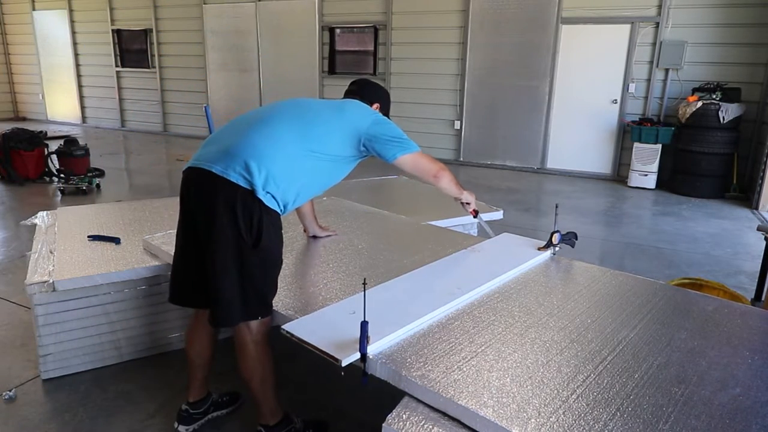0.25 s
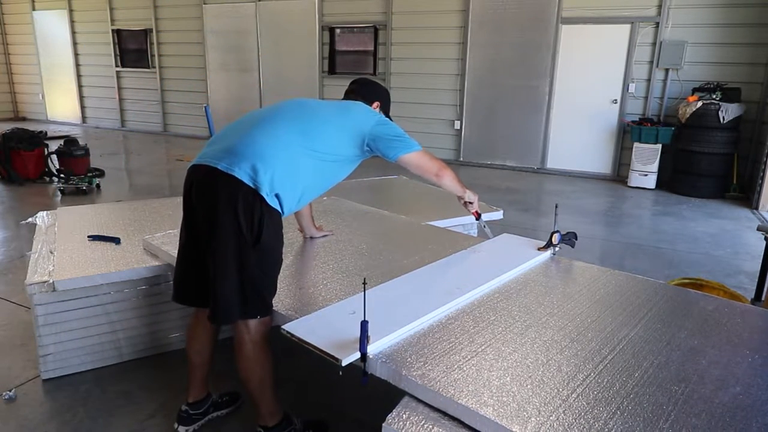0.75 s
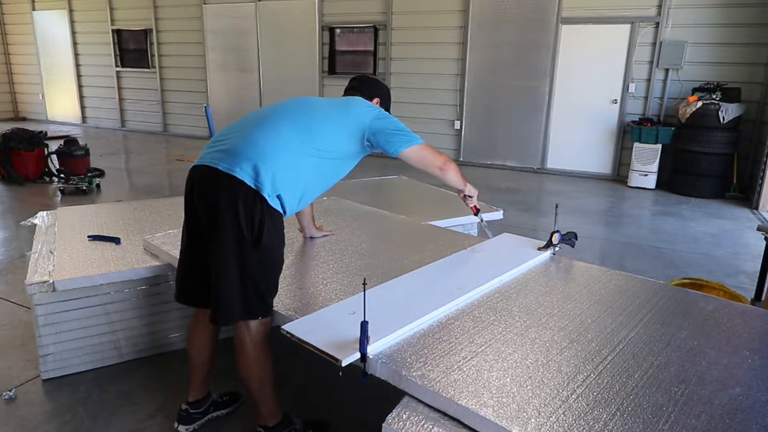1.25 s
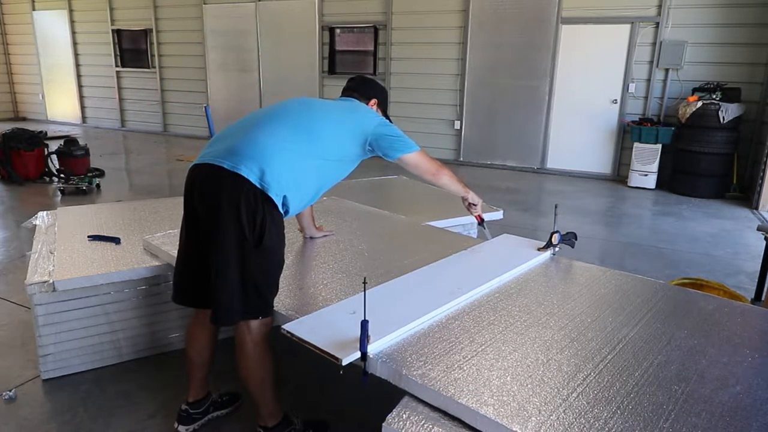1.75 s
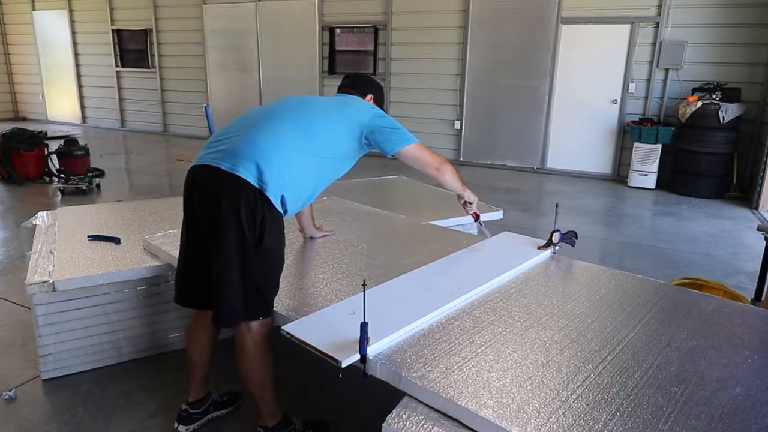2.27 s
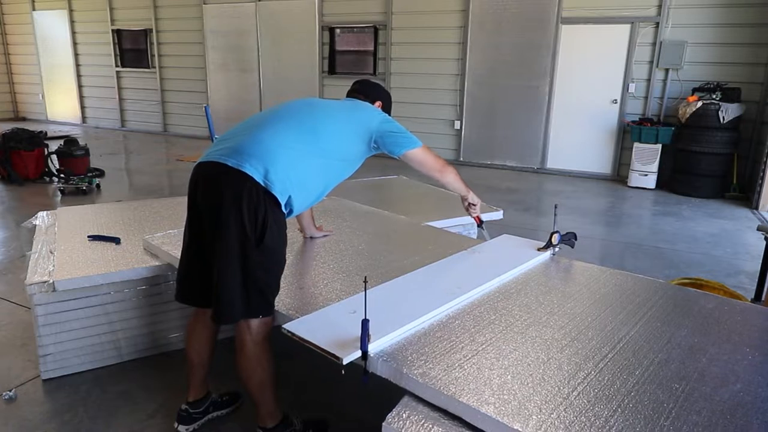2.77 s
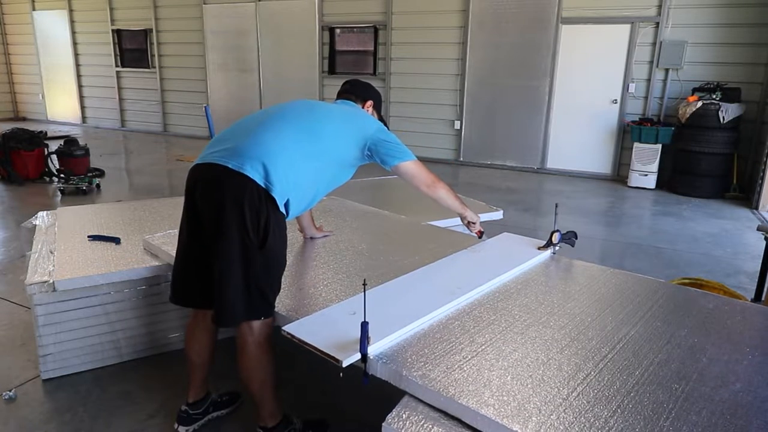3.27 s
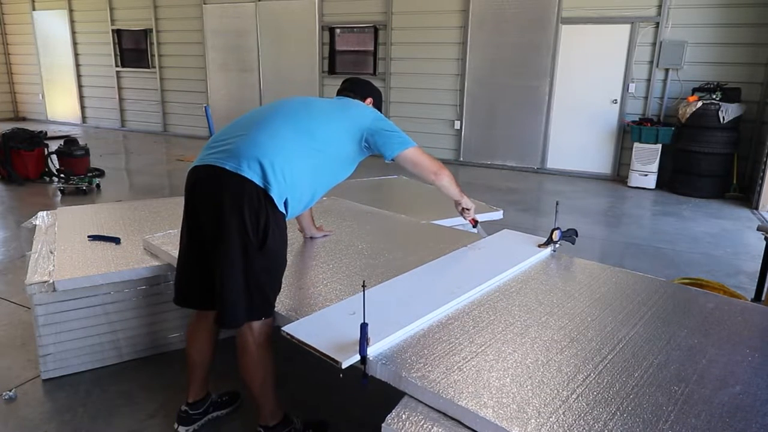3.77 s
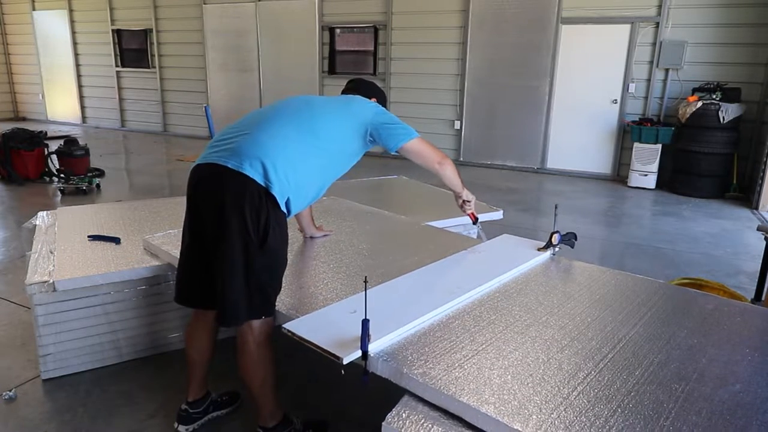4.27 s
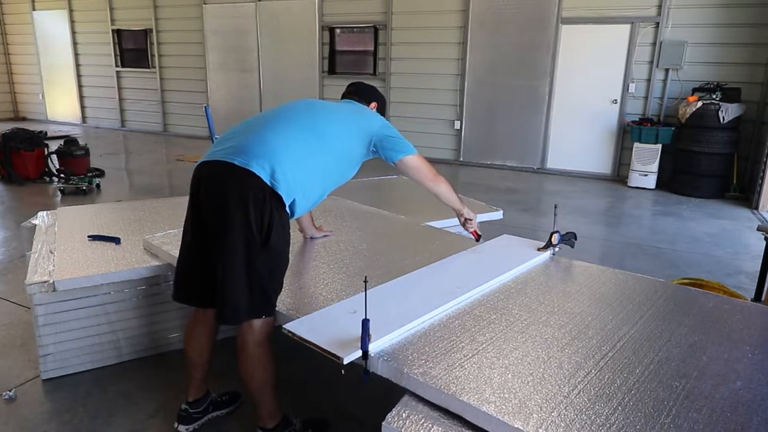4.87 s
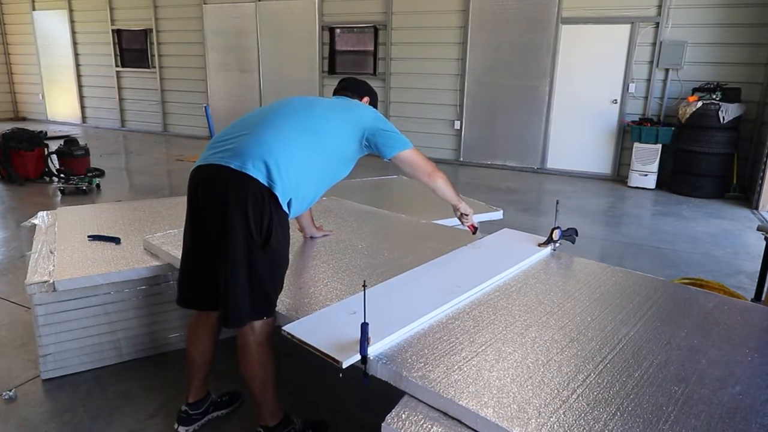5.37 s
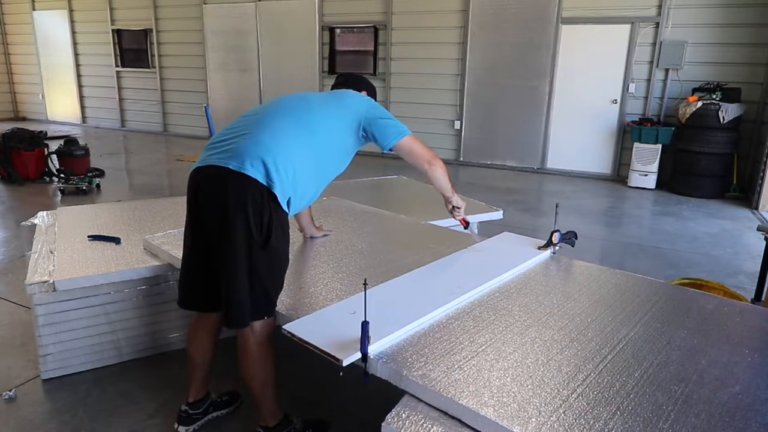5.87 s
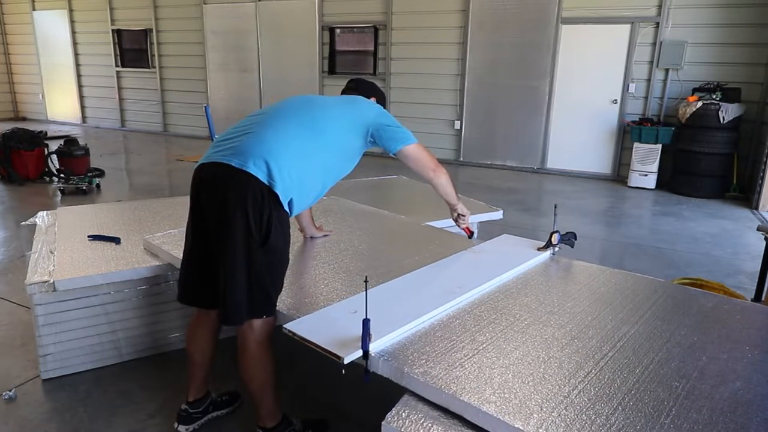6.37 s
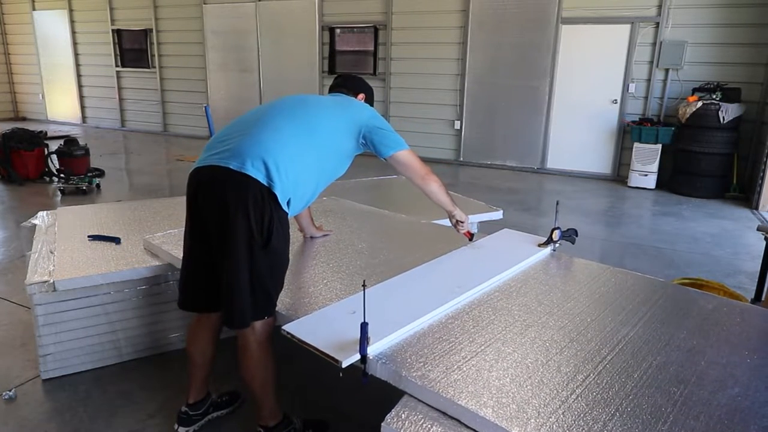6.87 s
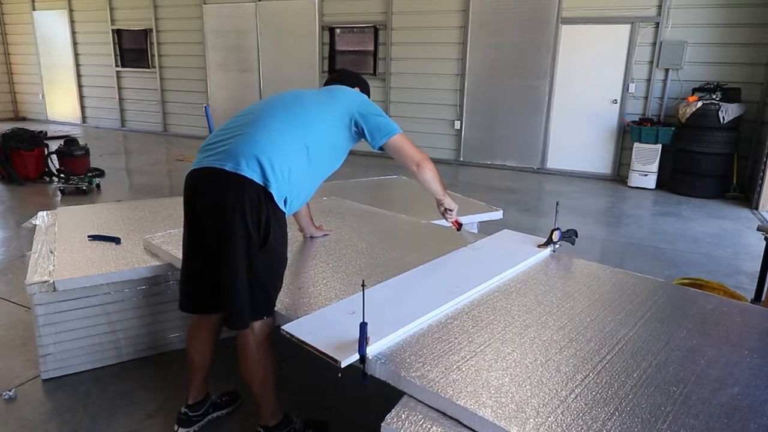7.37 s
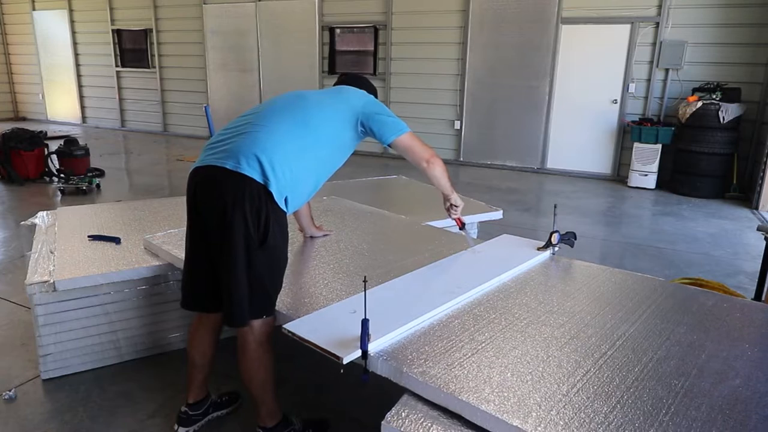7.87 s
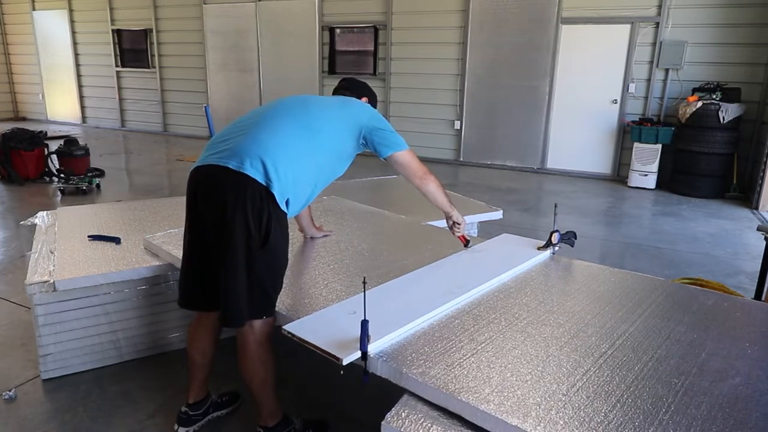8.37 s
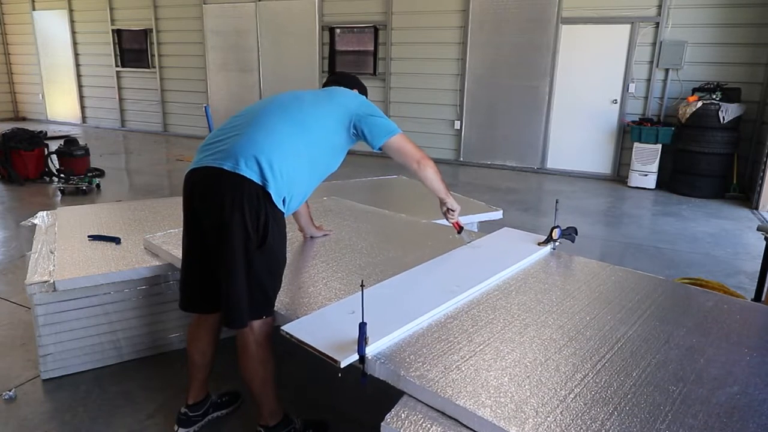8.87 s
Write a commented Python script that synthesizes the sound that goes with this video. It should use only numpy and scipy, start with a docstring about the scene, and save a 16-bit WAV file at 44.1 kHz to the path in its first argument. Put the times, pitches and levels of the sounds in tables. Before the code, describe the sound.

Hand sawing of stiff foam, irregular and squeaky, heard from moderate distance inside a reverberant hall. Early on there are soft dry scrapes, a few short whistling shrieks and small knocks. The middle is sparse, mostly faint rasping. Later, long strokes screech upward, hiss at full speed and groan as the blade binds, while the panel thuds and drones. Hard snaps and piercing squeaks continue to the end.

```python
"""A knock and a hollow bump, then light scrapes and hard strokes: a serrated knife saws a rigid foam board.
Foam sticks and slips on the blade: a squeal whose pitch follows the blade's speed, a groan as it stops,
a hiss at full speed. Teeth crush foam cells, giving fizz, rasp and blade ring; the panel drones, thuds
and heaves. A large, echoing workshop rings on."""
import sys
import numpy as np
from scipy import signal
from scipy.fft import rfft, irfft, next_fast_len
from scipy.io import wavfile
from scipy.ndimage import uniform_filter1d, minimum_filter1d

SR = 44100
rng = np.random.default_rng(int(sys.argv[2]) if len(sys.argv) > 2 else 0)


def transcribe(u):
    """Save the signal u as a 16-bit wav file named by the first command-line argument.

    u: samples, shape (n,) or (channels, n), limited to [-1, 1]; the rate is SR.
    q: integer samples, one column per channel.
    """
    v = np.clip(np.atleast_2d(u).T, -1, 1)
    q = np.round(v * 32767).astype(np.int16)
    wavfile.write(sys.argv[1], SR, q)


N = 402633  # samples

# Table levels are relative: each layer has its own gain.
# Hard cutting strokes: start_s, length_s, speed_up_s, slow_down_s, entry_slip_hz, full_slip_hz,
# roughness [0-1], squeal_db, fizz_db, rasp_db, pressure_rise_db [over the stroke]
STROKES = [(1.207, 0.14, .02, 0.042, 13600, 14170, 0.2, -23.5, -23.5, -30.5, 8.5),
           (1.847, .11, .01, 0.09, 15000, 15000, .04, -19, -41, -45, 6),
           (2.189, .257, 0.021, 0.065, 14700, 13840, 0.19, -26, -35.5, -41.5, -5),
           (4.008, 0.12, 0.0097, 0.076, 14300, 14690, 0.2, -16, -28, -36, 3),
           (4.726, 0.22, .2, .01, 13600, 12350, .12, -19, -28.5, -36, 0),
           (4.951, .125, .02, 0.081, 12850, 12050, 0.2, -19.5, -23, -35, -5),
           (5.297, .622, 0.16, 0.12, 6430, 13190, .13, -20, -25, -38, 6),
           (6.211, .51, .13, .2, 7490, 13080, .1, -19, -24, -38, 2.5),
           (6.984, 0.6, .36, .06, 1400, 12580, 0.2, -23, -21.5, -35.5, -8),
           (7.934, 0.43, 0.096, .08, 10400, 13600, 0.28, -30, -23.5, -30.5, -14),
           (8.703, 0.31, 0.077, 0.089, 8110, 13850, 0.04, -25.5, -30.5, -48, 20.5)]
# Light scrapes along the cut: start_s, length_s, drone_db, rasp_db, fizz_db, pressure_rise_db
SCRAPES = [(.22, 0.3, -49.5, -48.5, -53, 13), (0.594, .43, -42.5, -40.5, -50.5, -1),
           (1.015, 0.31, -49, -46, -54, 5), (1.313, 0.37, -47.5, -38.5, -45, 9),
           (1.619, 0.37, -41.5, -42, -44.5, -0.5), (1.97, 0.42, -55, -46, -51, 16),
           (2.504, 0.35, -46, -42, -43, 0), (2.763, 0.21, -34.5, -36, -44, -8),
           (2.902, 0.54, -43.5, -42.5, -42.5, -2), (3.452, 0.78, -45.5, -43.5, -45.5, 6),
           (4.072, 0.25, -46, -46, -56, 6), (4.317, 0.31, -56, -50, -46, 12),
           (4.504, 0.7, -37.5, -40, -43, -2), (5.037, 0.47, -54.5, -52, -52, -1),
           (5.484, 0.4, -39, -33.5, -46, 2), (5.85, 0.29, -43.5, -31.5, -38, -2),
           (6.126, 0.25, -44.5, -37, -34, 14), (6.312, 0.34, -41, -34, -53, 4),
           (6.685, 0.33, -44, -31, -41.5, -11), (7.39, 0.45, -42, -27.5, -39, 4),
           (7.794, .17, -37, -35, -42, 7), (8.02, 0.46, -46.5, -27, -27, 1),
           (8.329, 0.35, -36.5, -32.5, -41, -1), (8.662, 0.55, -43.5, -35, -31, -0.5)]
# Blade stirring in the cut between scrapes: drone_db, rasp_db, fizz_db
RESTING_DB = (-52.5, -56.5, -64.5)
# Foam gripping the blade: start_s, length_s, first_hz, middle_hz, last_hz, level_db, roughness [0-1]
SQUEAKS = [(1.295, .056, 4090, 3910, 3030, -21, 0.24), (1.418, 0.044, 1404, 2820, 5000, -32, 0.1),
           (1.467, 0.083, 11200, 10400, 13100, -26.5, .045), (1.512, 0.12, 11800, 13360, 13700, -27, 0.21),
           (2.228, 0.068, 15000, 14100, 13100, -20.5, 0.14), (2.412, 0.04, 6220, 4990, 3450, -30, 0.16),
           (2.546, 0.069, 3410, 4870, 6750, -35.5, 0.18), (2.6, 0.17, 9400, 12300, 15000, -37, 0.22),
           (3.004, 0.088, 13840, 9550, 9140, -26, 0), (3.046, 0.19, 10570, 11020, 10350, -31, 0.15),
           (3.83, 0.16, 15400, 14300, 13200, -37.5, 0.12), (4.268, 0.17, 4780, 5800, 8860, -50, 0.22),
           (4.45, 0.053, 7200, 10500, 15600, -39.5, 0.1), (4.569, .07, 14000, 14500, 14000, -34.5, 0.07),
           (5.004, 0.07, 4680, 4034, 3605, -24.5, .15), (5.24, 0.16, 5020, 4700, 4500, -36.5, 0.1),
           (5.38, .07, 4900, 4850, 4700, -31, 0.17), (5.336, 0.062, 4690, 4315, 4950, -12.5, 0.04),
           (5.849, 0.055, 5600, 4195, 2800, -21.5, 0.19), (6.156, 0.1, 6260, 8100, 8300, -34, 0.2),
           (6.158, 0.068, 4600, 4430, 3940, -33.5, 0.12), (6.214, 0.098, 3400, 4075, 5350, -24, 0.16),
           (6.265, 0.082, 8860, 9960, 10650, -20.5, .09), (6.567, 0.13, 4310, 3620, 3206, -22, .15),
           (6.655, .055, 3390, 3540, 3460, -19, .035), (6.999, 0.08, 1093, 1416, 2150, -28.5, 0.38),
           (7.029, .085, 1898, 2464, 4870, -18.5, 0.03), (7.08, 0.086, 4480, 4700, 4920, -17, 0.04),
           (7.144, 0.13, 8360, 8220, 8100, -19.5, 0), (7.237, 0.098, 10040, 10700, 12100, -21, 0.05),
           (7.515, .06, 4934, 3620, 1290, -20.5, 0.3), (7.574, 0.28, 1310, 1284, 1293, -41, 0.08),
           (7.961, 0.073, 1893, 3010, 4640, -22.5, 0.44), (8.037, 0.092, 14500, 13800, 14300, -20, 0.1),
           (8.318, 0.051, 12900, 9260, 7460, -27.5, 0.04), (8.721, 0.058, 8550, 10600, 14100, -26.5, 0.14),
           (8.786, .155, 14800, 13550, 14600, -21.5, 0), (8.798, 0.025, 5110, 4790, 4470, -24.5, 0.02),
           (8.947, 0.084, 7400, 9800, 13750, -20, 0.1), (8.935, 0.17, 4700, 4600, 4920, -23.5, 0.07),
           (9.029, 0.0385, 4580, 5000, 5070, -13.5, 0.04), (9.034, 0.097, 1290, 1336, 1760, -32, .11),
           (9.074, .065, 4980, 5090, 4950, -18.5, 0.06)]
# Blade snags and knocks: start_s, level_db, thud_db, treble_db
KNOCKS = [(0.079, -27.5, -24, -11), (1.746, -27, -12, -18), (2.790, -5, -26.5, -11), (2.937, -18, -27, -13),
          (3.119, -25, -13.5, -25), (3.211, -22, -18, -10), (3.743, -32, -33, -8), (3.88, -24, -48, -10),
          (4.248, -30, -14, -27), (5.586, -14.5, -45, -16), (6.273, -24, -38, 7), (6.381, -25, -8.5, -17),
          (7.962, -11, -19.5, -1), (8.345, -11, -19, -3)]
# Board bumping on its support: start_s, level_db
BUMPS = [(0.1054, -26), (2.825, -47), (2.88, -35), (4.599, -35), (4.684, -35), (4.695, -37), (4.724, -42),
         (6.385, -33), (6.429, -35.5)]
# Slow heaves of the big panel: crest_s, half_width_s [to 1/e], level_db
HEAVES = [(1.72, 0.099, -43), (2.42, 0.21, -41), (2.54, 0.027, -28), (3.05, 0.4, -52), (4.42, 0.14, -42.5),
          (4.72, 0.043, -38), (5.0, 0.072, -36), (6.15, 0.058, -46), (6.42, .1, -41.5), (7.73, 0.034, -44),
          (8.6, 0.1, -58)]

# Blade resonances in the cut: centre_hz, width_hz, level_db
BLADE_MODES = [(1950, 86, -10), (2630, 110, -3), (3143, 52, 4.5), (3410, 126, 2), (3710, 93, -2),
               (4200, 150, -1), (4840, 72, 9.5), (4870, 220, 0.5), (5940, 270, -13.5), (6190, 99, -15.5)]
# Board modes: pitch_hz, level_db, t60_s
BOARD_MODES = [(111, -12.5, 0.3), (170.4, -5, 0.15), (240, -7, 0.13), (342, -5.5, 0.19), (395, -6, 0.068),
               (708, -5, 0.18), (919, 0, 0.027), (1012, -1.5, 0.091), (1523, 8, 0.043), (2076, 6, 0.047),
               (2496, 17, 0.017), (2910, 5.5, 0.043), (4700, 8, 0.046)]
# Radiation of the squeal by blade and board: freq_hz, gain_db
RADIATION = [(800, -15), (2000, 1), (3400, -4.5), (4700, 1.5), (6000, -4), (7500, -3), (9000, -2.5),
             (10500, -0.5), (13000, -0.5), (15500, 1)]
# Hall decay: freq_hz, t60_s
HALL_DECAY = [(100, 0.93), (500, 1.32), (2000, 0.45), (3600, 0.67), (7000, 0.61), (11000, 0.43),
              (16000, 0.2)]

# Spectra of panel drone, blade rasp, crushed cells, thud, crack, snap, panel sway, still air:
# freq_hz, density_db [per Hz]
DRONE_SPECTRUM = [(40, -5), (95, 2.5), (130, -2), (185, 2.5), (310, 0), (440, 1.5), (650, 1.5), (820, -1.5),
                  (1280, 4.5), (1700, -2.5), (2300, -4.5), (4000, -17.5)]
RASP_SPECTRUM = [(500, -41), (1500, -4), (2400, -6.5), (3300, 1.5), (5000, 1), (6300, -4), (9000, -10.5),
                 (16000, -45)]
FIZZ_SPECTRUM = [(2500, -48), (5500, 1.5), (7200, -1.5), (8300, 2), (10300, 4.5), (13500, 2), (16000, 2)]
THUD_SPECTRUM = [(40, -17), (110, -21), (175, 7.5), (340, 6), (700, 4), (1000, 1), (1600, -4), (3000, -58)]
CRACK_SPECTRUM = [(150, -63), (700, -13.5), (1400, 1), (2600, -2), (4400, 2.5), (6000, -6), (12000, -27)]
SNAP_SPECTRUM = [(1500, -13), (3800, -2), (5000, 11), (6500, -13), (10000, -4.5), (16000, -6)]
SWAY_SPECTRUM = [(10, -4.5), (27, 1), (45, 3.5), (90, -13.5), (200, -29), (600, -39)]
AIR_SPECTRUM = [(20, -6), (80, 0), (300, -5.5), (1000, -1.5), (3500, -8.5), (8000, -51), (16000, -53)]

STALL_HZ, BRAKING_POWER = 1218, 1.5  # slip rate as the blade stops; power law of slowing
STROKE_ATTACK_S, STROKE_RELEASE_S = 0.053, 0.014
BIND_ROUGH, BIND_RASP_DB, BIND_FIZZ_DB = 0.12, 12, -17  # what a slow, binding blade adds
HAND_DB, HAND_RATE_HZ = -0.53, 21.8  # unsteadiness of the hand; its changes a second
SCRAPE_ATTACK, SCRAPE_RELEASE = 0.19, 0.38  # shares of length
SQUEAK_ATTACK, SQUEAK_RELEASE = 0.25, 0.26  # shares of length
BLADE_SHIFT = 0.043  # share by which resonances move with the blade's free length
TOP_HZ, CEILING = 15830, 0.87  # band limit; full-scale amplitude that peaks round off towards


def cutting(squeal_db=-4.5, drone_db=-1.5, rasp_db=-5, ring_db=-4, fizz_db=-2, grit_db=-14, chirp_db=-7):
    """Teeth tear cells: foam squeals and fizzes, blade rasps and rings, panel drones."""
    squeal, hard_rasp, hard_fizz = strokes()
    drone, light_rasp, light_fizz = scrapes()
    rasp = np.hypot(hard_rasp, light_rasp)
    fizz = np.hypot(hard_fizz, light_fizz)

    cells = coloured(bite() * crackle(rate_hz=10000, scatter_db=1.0), FIZZ_SPECTRUM)
    grit = coloured(crackle(rate_hz=130, scatter_db=-6.5), SNAP_SPECTRUM)  # whole beads tearing out
    teeth = coloured(bite() * crackle(rate_hz=4000, scatter_db=3.0), RASP_SPECTRUM)
    ring = ringing(bite() * crackle(rate_hz=1200, scatter_db=0))
    panel = coloured(bite() * crackle(rate_hz=1500, scatter_db=1.5), DRONE_SPECTRUM)

    foam = amp(fizz_db) * cells + amp(grit_db) * grit + amp(chirp_db) * chirps()
    steel = amp(rasp_db) * teeth + amp(ring_db) * ring
    return amp(squeal_db) * squeal + fizz * foam + rasp * steel + drone * amp(drone_db) * panel


def strokes():
    """Squeal, rasp strength and fizz strength; slip rate follows blade speed through each stroke."""
    squeal, rasp, fizz = np.zeros((3, N))
    for (start_s, length_s, speed_up_s, slow_down_s, entry_hz, full_hz,
         rough, squeal_db, fizz_db, rasp_db, lean_db) in STROKES:
        t, force = gesture(length_s, STROKE_ATTACK_S, STROKE_RELEASE_S)
        hand_db = HAND_DB * wobble(HAND_RATE_HZ, size=len(t))
        force = force * amp(lean_db * (t / length_s - 0.5) + hand_db)

        running_hz = entry_hz + (full_hz - entry_hz) * ramp(t / speed_up_s)
        braked = np.clip(1 - (length_s - t) / slow_down_s, 0, 1) ** BRAKING_POWER
        pitch_hz = running_hz + (STALL_HZ - running_hz) * braked
        bind = np.clip(1 - pitch_hz / full_hz, 0, 1)

        voice = stick_slip(pitch_hz, rough + BIND_ROUGH * bind, catch_db=2.5, wander=0.25,
                           twin_db=-13.5, twin_apart=0.3, second_db=-5, third_db=-14)
        add(squeal, start_s, amp(squeal_db) * force * voice)
        add(rasp, start_s, amp(rasp_db + BIND_RASP_DB * bind) * force)
        add(fizz, start_s, amp(fizz_db + BIND_FIZZ_DB * bind) * force)
    radiated = filtered(squeal, lambda hz: amp(along(RADIATION, hz)))
    return radiated, rasp, fizz


def stick_slip(pitch_hz, rough, catch_db, wander, twin_db, twin_apart, second_db, third_db,
               cycles_per_slip=2.2):
    """Foam grips and releases each blade flank; uneven slips smear the whistle into a screech."""
    def chance(rate_hz):
        return wobble(rate_hz, size=len(pitch_hz))

    def flank(detune):
        jitter = 0.82 * chance(pitch_hz / cycles_per_slip) + wander * chance(130)
        slip_hz = pitch_hz * np.exp(detune + rough * jitter)
        phase = 2 * np.pi * np.cumsum(slip_hz) / SR
        # overtones stop at the Nyquist limit
        second = amp(second_db) * np.sin(2 * phase) * (2 * slip_hz < SR / 2)
        third = amp(third_db) * np.sin(3 * phase) * (slip_hz < SR / 6)
        grip = amp(catch_db * chance(450))  # each tooth catches with its own force
        return unit(grip * (np.sin(phase) + second + third))

    # the other flank slips at a wandering, on average faster, rate
    twin = flank(twin_apart * np.sqrt(np.abs(rough)) * (1 + chance(30)))
    return unit(flank(0) + amp(twin_db) * twin)


def scrapes():
    """Drone, rasp and fizz strengths as teeth drag lightly along the cut."""
    layers = np.zeros((3, N))
    for start_s, length_s, *levels_db, lean_db in SCRAPES:
        t, force = gesture(length_s, SCRAPE_ATTACK * length_s, SCRAPE_RELEASE * length_s)
        pressure_db = lean_db * (t / length_s - 0.5)
        for layer, level_db in zip(layers, levels_db):
            add(layer, start_s, amp(level_db + pressure_db) * force)
    return np.hypot(layers, amp(RESTING_DB)[:, None])


def bite():
    """Uneven biting of the teeth: a random gain of rms 1."""
    return unit(amp(0.65 * wobble(240) + 1.9 * wobble(50)))


def crackle(rate_hz, scatter_db):
    """Tiny ruptures at random moments and of random sizes, at rms 1."""
    ruptures = rng.random(N) < rate_hz / SR
    signs = rng.choice([-1, 1], N)
    return unit(ruptures * signs * amp(scatter_db * rng.standard_normal(N)))


def chirps(count=260, centre_hz=12500, spread=0.15, length_s=0.036, bend=0.18, scatter_db=2, rough=0.0396):
    """Single teeth catch at random and chirp up or down, at rms 1."""
    out = np.zeros(N)
    t, force = gesture(length_s, length_s / 2, length_s / 2)
    starts_s = rng.random(count) * N / SR
    for start_s, (pitch, glide, size) in zip(starts_s, rng.standard_normal((count, 3))):
        pitch_hz = centre_hz * np.exp(spread * pitch + bend * glide * (t / length_s - 0.5))
        rough_hz = pitch_hz * (1 + rough * wobble(2980, size=len(t)))
        phase = 2 * np.pi * np.cumsum(np.minimum(rough_hz, SR / 2)) / SR
        add(out, start_s, amp(scatter_db * size) * force * np.sin(phase))
    return unit(out)


def ringing(teeth, drift_rate_hz=4):
    """Teeth ring the blade; its resonances drift as it slides in and out; at rms 1."""
    depth = np.clip(wobble(drift_rate_hz), -1, 1)
    out = np.zeros(N)
    # crossfade between three blade depths
    for k in (-1, 0, 1):
        share = np.sqrt(np.maximum(1 - abs(depth - k), 0))
        out += share * filtered(teeth, lambda hz: blade(hz * (1 + k * BLADE_SHIFT)))
    return unit(out)


def blade(hz):
    """Complex response of the blade: a sum of resonances of alternating sign."""
    response = 0
    for k, (centre_hz, width_hz, level_db) in enumerate(BLADE_MODES):
        damping = 1j * hz * width_hz
        response = response + (-1) ** k * amp(level_db) * damping / (centre_hz ** 2 - hz ** 2 + damping)
    return response


def squeaks(level_db=-1):
    """Where foam grips, a short stick-slip squeak swells, bends in pitch and lets go."""
    out = np.zeros(N)
    for start_s, length_s, first_hz, middle_hz, last_hz, squeak_db, rough in SQUEAKS:
        t, force = gesture(length_s, SQUEAK_ATTACK * length_s, SQUEAK_RELEASE * length_s)
        bend = np.polyfit([0, 0.5, 1], np.log([first_hz, middle_hz, last_hz]), 2)
        pitch_hz = np.exp(np.polyval(bend, t / length_s))
        voice = stick_slip(pitch_hz, rough, catch_db=2, wander=0.45,
                           twin_db=-5.5, twin_apart=0.25, second_db=-14, third_db=-16)
        add(out, start_s, amp(squeak_db + level_db) * force * voice)
    return out


def knocks(crack_t60_s=0.029, snap_t60_s=0.014, thud_t60_s=0.14, tick_t60_s=0.0041,
           crack_db=-10, snap_db=1, thud_db=3, tick_db=-3):
    """Blade snags or butts the board: decaying noise bursts, tick, crack and snap over a panel thud."""
    out = np.zeros(N)
    t = np.arange(SR // 2) / SR

    def burst(spectrum, t60_s):
        return coloured(rng.standard_normal(len(t)), spectrum) * amp(-60 * t / t60_s)

    for start_s, level_db, low_db, treble_db in KNOCKS:
        hit = amp(crack_db) * burst(CRACK_SPECTRUM, crack_t60_s)
        hit += amp(snap_db + treble_db) * burst(SNAP_SPECTRUM, snap_t60_s)
        hit += amp(tick_db) * burst(CRACK_SPECTRUM, tick_t60_s)
        hit += amp(thud_db + low_db) * burst(THUD_SPECTRUM, thud_t60_s)
        add(out, start_s, amp(level_db) * hit)
    return out


def bumps(level_db=1, dulling=1.0, blur=0.023, onset_s=0.000043):
    """Each bump rings the board's modes; softer bumps lose upper modes."""
    out = np.zeros(N)
    t = np.arange(SR // 2) / SR
    mode_hz, mode_db, t60_s = np.transpose(BOARD_MODES)[:, :, None]
    hardest_db = max(bump_db for _, bump_db in BUMPS)
    for start_s, bump_db in BUMPS:
        octaves_up = np.maximum(np.log2(mode_hz / 1100), 0)
        softness_db = dulling * (bump_db - hardest_db) * octaves_up
        decay = amp(mode_db + softness_db - 60 * t / t60_s)
        # the loose board chatters, smearing every mode
        drift = np.cumsum(rng.standard_normal(decay.shape) * np.sqrt(blur * mode_hz / SR), axis=1)
        cycles = mode_hz * t + drift + rng.random(mode_hz.shape)
        ring = (decay * np.sin(2 * np.pi * cycles)).sum(0)
        add(out, start_s, amp(bump_db + level_db) * ring * (1 - np.exp(-t / onset_s)))
    return filtered(out, lambda hz: 1 / (1 + 1j * hz / 3600) ** 2 / (1 + (hz / 4500) ** 8))


def background(rest_db=-67, air_db=-57):
    """Slow heaving of the panel and still air of the building, as coloured noise."""
    t = np.arange(N) / SR
    heave = amp(rest_db)
    for crest_s, half_width_s, level_db in HEAVES:
        heave = heave + amp(level_db) * np.exp(-((t - crest_s) / half_width_s) ** 2)
    sway = coloured(rng.standard_normal(N), SWAY_SPECTRUM)
    air = coloured(rng.standard_normal(N), AIR_SPECTRUM)
    return heave * sway + amp(air_db) * air


def hall(x, near_db=-7, near_t60_s=0.035, tail_db=-9, build_up_s=0.0009):
    """Board and floor reflect at once; far walls ring on, each band with its own decay."""
    hz, t, noise = signal.stft(rng.standard_normal(SR + SR // 2), SR, nperseg=256)
    decay = amp(-60 * t / along(HALL_DECAY, hz)[:, None])
    tail = signal.istft(noise * decay, SR, nperseg=256)[1]
    t = np.arange(len(tail)) / SR
    tail *= 1 - np.exp(-t / build_up_s)
    near = rng.standard_normal(len(t)) * amp(-60 * t / near_t60_s) * (t > 0.001)
    echo = amp(near_db) * near / np.linalg.norm(near) + amp(tail_db) * tail / np.linalg.norm(tail)
    return x + signal.fftconvolve(x, echo)[:N]


def amp(db):
    """Decibels to amplitude."""
    return 10 ** (np.asarray(db) / 20)


def unit(x):
    """x at rms 1."""
    return x / np.sqrt(np.mean(x ** 2) + 1e-20)


def along(points, hz):
    """Interpolate (freq_hz, value) points on a log axis."""
    freq_hz, value = np.transpose(points)
    return np.interp(np.log(hz + 1), np.log(np.sort(freq_hz) + 1), value)


def wobble(rate_hz, size=N):
    """Smooth random curve of rms 1; rate_hz, in knots a second, may itself be a curve."""
    place = rng.random() + np.cumsum(np.minimum(rate_hz, SR) * np.ones(size)) / SR
    knots = rng.standard_normal(size + 3)
    k, u = place.astype(int), place % 1
    ease = u * u * (3 - 2 * u)
    return unit(knots[k] + ease * (knots[k + 1] - knots[k]))


def filtered(x, response):
    """Filter x by a complex response of frequency."""
    size = next_fast_len(len(x) + 8192, True)
    return irfft(rfft(x, size) * response(np.fft.rfftfreq(size, 1 / SR)), size)[:len(x)]


def coloured(x, spectrum):
    """x shaped by the spectrum, at rms 1."""
    return unit(filtered(x, lambda hz: amp(along(spectrum, hz))))


def ramp(u):
    """Smooth step from 0 to 1 as u goes from 0 to 1."""
    return np.sin(np.pi / 2 * np.clip(u, 0, 1)) ** 2


def gesture(length_s, attack_s, release_s):
    """Time axis of one movement and its attack-hold-release envelope."""
    t = np.arange(int(length_s * SR)) / SR
    return t, ramp(t / attack_s) * ramp((length_s - t) / release_s)


def add(out, start_s, x):
    """Mix x into out from start_s on, cut at the end of out."""
    part = out[round(start_s * SR):][:len(x)]
    part += x[:len(part)]


def scene():
    """Sawing in the hall over the background, mono."""
    sawing = cutting() + squeaks() + knocks() + bumps()
    return (hall(sawing) + background())[None]


def record(dry, threshold_db=-17, squeeze=0.23, hold_s=0.016):
    """The level dips under loud sounds and holds briefly; peaks round off; nothing passes TOP_HZ."""
    power = np.abs(uniform_filter1d(dry[0] ** 2, size=512))
    wanted = np.minimum(1, amp(threshold_db) / np.sqrt(power + 1e-12)) ** squeeze
    span = max(int(hold_s * SR), 2)
    past = (span - 1) // 2  # shifts the windows onto past samples
    held = minimum_filter1d(wanted, span, origin=past)
    x = dry[0] * uniform_filter1d(held, span, origin=past)
    rounded = x / (1 + (x / CEILING) ** 4) ** (1 / 4)
    return filtered(rounded, lambda hz: hz < TOP_HZ)[None]


dry = scene()
out = record(dry)
transcribe(out)
```